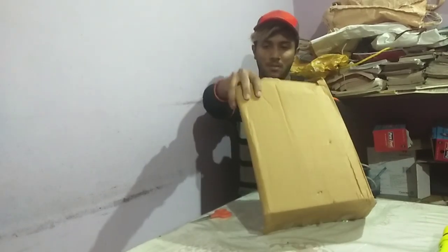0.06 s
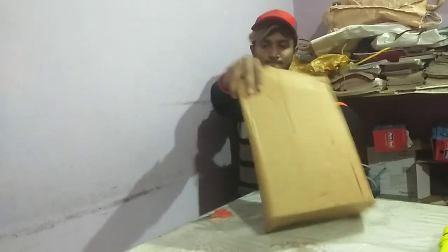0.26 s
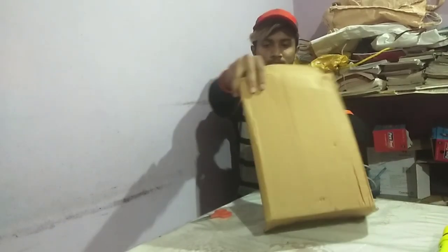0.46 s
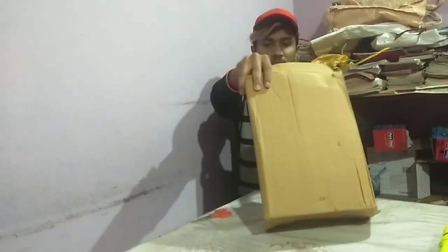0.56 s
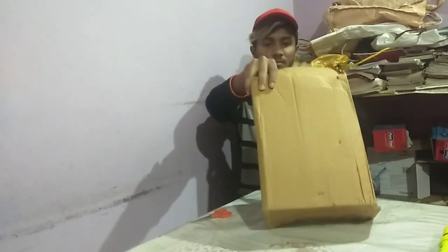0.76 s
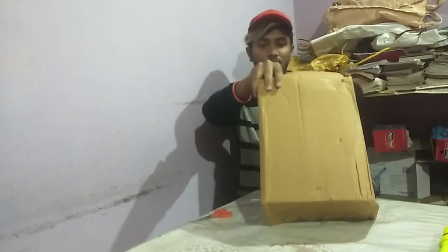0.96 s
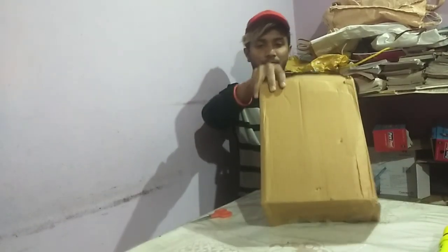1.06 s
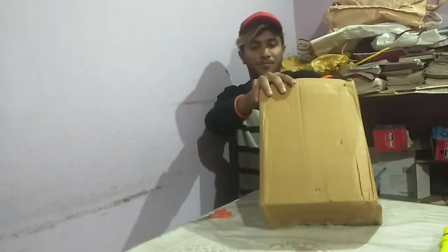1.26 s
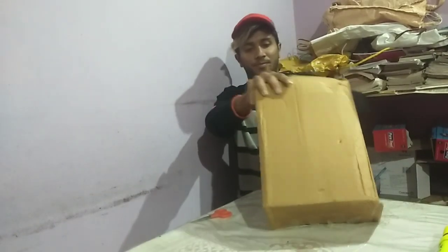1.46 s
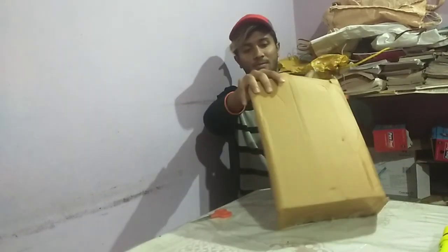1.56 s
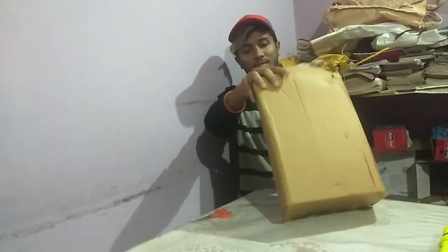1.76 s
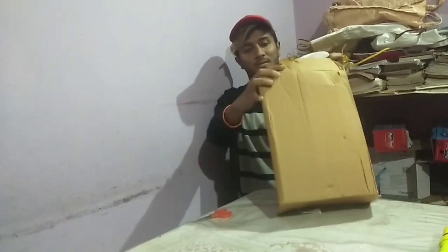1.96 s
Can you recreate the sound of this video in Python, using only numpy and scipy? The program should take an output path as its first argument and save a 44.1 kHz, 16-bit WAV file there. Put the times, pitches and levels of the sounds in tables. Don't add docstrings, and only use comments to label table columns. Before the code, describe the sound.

A large cardboard carton is handled on a plastic-covered table. Soft knocks and rustle at 0-0.15 s, then a loud, dense burst of hollow, papery thumps from 0.2 to 0.4 s, fading. Near quiet with tiny plastic ticks and a faint creak until 0.93 s. A shorter hollow thump peaks around 1.04 s, then uneven, crackling scraping runs 1.2-1.9 s, with a sharp snap near 1.7 s. Small room, faint low table rumble, mono.

```python
import sys
import numpy as np
from scipy import signal
from scipy.fft import rfft, irfft
from scipy.io import wavfile
from scipy.ndimage import uniform_filter1d

SR = 44100
rng = np.random.default_rng(int(sys.argv[2]) if len(sys.argv) > 2 else 0)


def invert_db(x):
    u = np.asarray(x, float) / 20
    return 10 ** u


def pcm_store(signal):
    levels = np.round(np.clip(np.atleast_2d(signal), -1, 1) * 32767)
    wavfile.write(sys.argv[1], SR, levels.astype(np.int16).T)


N = 88200
T = np.arange(N) / SR

# (time [s], peak level [dB], centre of the ring [Hz], crack level [dB])
WALL_KNOCKS = [(.016, -24, 1470, -14), (.026, -25, 770, -27), (.038, -27, 760, -16), (.054, -16, 1060, -21),
               (.074, -43, 810, -14), (.109, -36, 955, -14), (.209, -16.5, 636, -22), (.221, -17, 895, -5),
               (.236, -22, 800, -3), (.2435, -3.5, 1040, -6), (.2485, -4, 860, -8), (.259, 0.5, 850, -13),
               (.265, -4, 785, -6), (.271, -1.5, 1270, -4), (.275, -1.5, 1320, -8), (.282, -6.5, 1100, -8),
               (.289, -1, 930, -1), (.296, 2, 1560, -14), (.3075, -1.5, 1310, -5), (.312, -9.5, 1170, -7),
               (.324, -1.5, 1240, -5.5), (.344, -2.5, 1050, -5.5), (.350, -5.5, 900, -12),
               (.368, -12.5, 1320, -4), (.384, -13, 1440, -2.5), (.654, -33.5, 800, -9),
               (.934, -29, 330, -19), (.940, -28, 497, -26), (.946, -26, 746, -34), (.973, -26, 1170, -30),
               (.979, -21, 1140, -30), (1.035, -16.5, 455, -20), (1.038, -6, 520, -26),
               (1.044, -17, 900, -23), (1.053, -9, 546, -16), (1.064, -16.5, 1120, -20),
               (1.081, -21, 590, -28), (1.093, -26.5, 574, -29), (1.111, -20, 1580, -17),
               (1.154, -18, 2150, -19), (1.708, -27, 2120, 8), (1.977, -26.5, 1510, -9)]
# (frequency [Hz], level [dB], free ring time T60 [s])
WALL_MODES = [(234.6, 13, 0.17), (422.5, 6, 0.07), (542, 4, 0.095), (590, -2.5, 0.076), (667, -12, 0.033),
              (759, 3.5, 0.12), (886, -1.5, 0.082), (1003, 0, 0.077), (1200, 1, 0.073), (1240, -8, 0.02),
              (1449, 6, 0.039), (1635, -3, 0.09), (2150, 12.5, 0.023), (2670, -50, 0.09)]
# (frequency [Hz], density [dB per Hz])
CRACK_COLOUR = [(500, 0.5), (1500, 2.5), (3500, -3.5), (6500, -9.5), (15000, -15)]
# (time [s], level [dB], sheen level [dB])
TUMBLE_BOUTS = [
    [(0, -27, -35), (.016, -26.5, -22), (.048, -25, -17), (.068, -27, -20), (.138, -40.5, -4),
     (.185, -30, -19), (.2, -50, -5)],
    [(.19, -42, -7), (.206, -28, 0), (.211, -17, -2), (.232, -17, -1), (.246, -17, -3), (.35, -18, -4),
     (.39, -25, -5), (.53, -45, 1), (.72, -58, 0)],
    [(.93, -66, -15), (.936, -42, -14), (.965, -33.5, -11), (.984, -28.5, -24), (.995, -34.5, -11),
     (1.033, -39.5, -7), (1.038, -14.5, -20), (1.076, -25.5, -24), (1.2, -42.5, -7)],
]
# (frequency [Hz], density [dB per Hz])
CARD_COLOUR = [(150, -19.5), (330, -7.5), (520, 14.5), (800, 8.5), (1300, 11.5), (3000, -5), (9000, -45),
               (16000, -52)]
# (frequency [Hz], density [dB per Hz])
SHEEN_COLOUR = [(500, -3), (1500, 1.5), (3500, 1.5), (6500, -5.5), (9000, -3), (12500, -2), (15000, -13)]
# (time [s], level [dB], tilt [dB per octave])
DRAG_PRESSURE = [(1.08, -43.5, -3), (1.18, -39.5, -2.5), (1.225, -29.5, 1), (1.246, -20.5, 1),
                 (1.28, -32, -0.5), (1.33, -25, 0), (1.385, -28, -.5), (1.42, -24.5, -0.5),
                 (1.5, -22.5, 0.5), (1.58, -25.5, -1), (1.665, -24, 1), (1.68, -29.5, 0.5), (1.72, -27, 1),
                 (1.79, -26.5, -0.5), (1.85, -26.5, 1), (1.95, -38.5, 0), (1.985, -37, 3.5), (2, -34.5, -2)]
# (frequency [Hz], density [dB per Hz])
COVER_COLOUR = [(60, 9.5), (250, -13.5), (600, 0.5), (1200, 1.5), (2300, -1), (5000, -5.5), (10000, -7),
                (15000, -13.5)]
# (time [s], frequency [Hz])
CREASE_PITCH = [(1.1, 2180), (1.24, 5700), (1.33, 2190), (1.43, 4130), (1.56, 2440), (1.8, 2990),
                (1.9, 1374), (2, 2530)]
# (time [s], peak level [dB], centre [Hz], length [s])
PLASTIC_TICKS = [(.011, -33, 3300, .004), (.0165, -23, 3400, .0015), (.073, -33, 4200, .002),
                 (.054, -27, 4500, .003), (.056, -33, 13000, .003), (.193, -35, 13000, .006),
                 (.194, -30, 1200, .004), (.289, -12, 5000, .003), (.548, -35, 10500, .013),
                 (.599, -39, 2400, .003), (.599, -41, 4500, .003), (.600, -40, 7500, .003),
                 (.61, -46, 12500, .015), (.728, -40, 13500, .0015), (.729, -43, 4000, .002),
                 (.755, -50, 11000, .012), (.779, -46, 6000, .002), (.779, -46, 13000, .002),
                 (.858, -39, 12500, .0012), (.859, -41, 5000, .0015), (.944, -42, 12000, .002),
                 (.944, -40, 5000, .002), (.974, -32, 3200, .005), (1.048, -31, 12500, .009),
                 (1.152, -27, 2150, .003), (1.10, -36, 12500, .02), (1.233, -27, 12800, .004),
                 (1.246, -25, 12800, .003), (1.186, -34, 13500, .003), (1.186, -29, 5500, .004),
                 (1.11, -26, 4500, .005), (1.236, -23, 7000, .012), (1.40, -25, 4300, .03),
                 (1.44, -26, 4800, .03), (1.462, -19, 2200, .005), (1.983, -22, 3500, .003),
                 (1.982, -30, 12000, .003), (1.981, -21, 1450, .003)]
# (time [s], level [dB])
TABLE_THUDS = [(0, -63), (0.068, -54), (.21, -47), (0.26, -42), (0.332, -35), (0.399, -50), (.46, -50.5),
               (.53, -61.5), (.64, -61), (.07, -58.5), (0.934, -56), (.985, -53), (1.042, -46.5),
               (1.257, -56), (1.601, -47), (1.722, -50), (1.901, -54.5)]
# (frequency [Hz], density [dB per Hz])
ROOM_TONE_COLOUR = [(40, -4), (80, 8.5), (150, -3), (280, -13.5), (800, -7.5), (2500, -12.5), (8500, -22.5),
                    (14000, -29.5)]
# (frequency [Hz], gain [dB])
MIC_RESPONSE = [(60, -33), (200, -13), (330, -7.5), (520, -0.5), (7000, 0.5), (9000, -3), (11500, -1),
                (15000, 1.5)]

RING_OCT, SCATTER_DB = 0.9, 1
CONTACT_S, CRACK_S = 0.0012, 0.0061
DAMPED = 0.3
FLECKS_PER_S, FLECK_OCT, FLECK_CYCLES, FLECK_DB = 900, 0.5, 7, -4.5
CREAK_S, CREAK_LEN_S, CREAK_HZ, CREAK_DB = 0.8, 0.065, 810, -54.5
THUD_HZ, THUD_DB, THUD_T60_S = 70.4, 26.5, 0.5
ROOM_T60_S, ROOM_DB, ROOM_DAMP_HZ, TONE_DB = 0.5, -12, 6000, -45
CEILING, TOP_HZ = 0.8, 15330


def unit(x):
    return x / np.sqrt(np.mean(x ** 2))


def colour(x, points):
    hz, db = np.array(points, float).T
    f = np.fft.rfftfreq(4096, 1 / SR)
    gain_db = np.interp(np.log(f + 1), np.log(hz), np.maximum(db, -70))
    cepstrum = irfft(gain_db * np.log(10) / 20)
    cepstrum[1:2048] *= 2
    cepstrum[2049:] = 0
    impulse = irfft(np.exp(rfft(cepstrum)))
    return signal.fftconvolve(x, impulse)[:len(x)]


def band(x, hz, width):
    return signal.lfilter(*signal.iirpeak(min(hz, 0.45 * SR), hz / width, fs=SR), x)


def walk(rate):
    k = int(SR / rate)
    steps = np.repeat(rng.standard_normal(N // k + 1), k)
    return 0.64 * uniform_filter1d(uniform_filter1d(steps, k), k)[:N]


def slips(rate, spread_db):
    chance, size, sign = rng.random(N), rng.exponential(size=N), rng.standard_normal(N)
    return unit((chance < rate / SR) * sign * invert_db(spread_db * size))


def curve(rows, column=1):
    r = np.array(rows, float)
    return np.interp(T, r[:, 0], r[:, column])


def add(out, s, x):
    i = int(s * SR)
    out[i:i + len(x)] += x[:N - i]


def knocks():
    out, t = np.zeros(N), T[:8192]
    hz, db, t60 = np.array(WALL_MODES).T[:, :, None]
    for s, peak_db, centre, crack_db in WALL_KNOCKS:
        level_z, pitch_z, phase_z = rng.standard_normal((3, len(WALL_MODES), 1))
        crack = rng.standard_normal(8192)
        octaves_off = np.log2(hz / centre)
        gain = invert_db(db + SCATTER_DB * level_z - 10 * (octaves_off / RING_OCT) ** 2)
        phase = 2 * np.pi * hz * (1 + 0.012 * pitch_z) * t + 1.17 * phase_z
        ring = (gain * np.sin(phase) * 1000. ** (-t / (DAMPED * t60))).sum(0)
        rise = 1 - np.exp(-t / CONTACT_S)
        snap = unit(colour(crack, CRACK_COLOUR)) * np.exp(-t / CRACK_S) * invert_db(crack_db)
        add(out, s, invert_db(peak_db) * rise * (ring / np.abs(ring * rise).max() + snap))
    return out


def tumble():
    force = slips(6000, 1.2) * invert_db(2.3 * walk(120))
    walls = sum(invert_db(db) * band(force, hz, 14 / t60) for hz, db, t60 in WALL_MODES)
    body = unit(unit(walls) + 1.44 * unit(colour(force, CARD_COLOUR)))
    sheen = unit(colour(slips(9000, 1.5), SHEEN_COLOUR)) * invert_db(3 * walk(40))
    out = 0
    for rows in TUMBLE_BOUTS:
        on = (T >= rows[0][0]) & (T <= rows[-1][0])
        sheen_gain = invert_db(curve(rows, column=2))
        out = out + on * invert_db(curve(rows) - 5) * (body + sheen_gain * sheen)
    return out


def drag():
    force = unit(colour(slips(14000, 0.82), COVER_COLOUR))
    hiss, shared = 0, walk(15.47)
    tilt = curve(DRAG_PRESSURE, column=2)
    for hz in 60 * 2. ** np.arange(0, 8.6, 0.5):
        flicker = shared + 3 * min(hz / 600, 1) * walk(40)
        db = tilt * np.log2(hz / 3000) + flicker
        hiss = hiss + invert_db(db) * band(force, hz, 0.5 * hz)
    on = T > DRAG_PRESSURE[0][0]
    return on * invert_db(curve(DRAG_PRESSURE) - 3) * (hiss / 1.423 + flecks())


def flecks():
    out, t, n = np.zeros(N), T[:1024], FLECKS_PER_S * N // SR
    path_s, path_hz = np.array(CREASE_PITCH).T
    times = rng.random(n) * N / SR
    for s, pitch_z, size in zip(times, rng.standard_normal(n), rng.exponential(size=n)):
        hz = np.clip(np.interp(s, path_s, path_hz) * 2 ** (FLECK_OCT * pitch_z), 500, 9000)
        swell = (t * hz) * np.exp(-t * hz * 3 / FLECK_CYCLES)
        add(out, s, invert_db(1.8 * size) * np.sin(2 * np.pi * hz * t) * swell)
    return unit(out) * invert_db(FLECK_DB)


def ticks():
    out, t = np.zeros(N), T[:4096]
    for s, db, hz, length in PLASTIC_TICKS:
        puff = unit(band(rng.standard_normal(4096), hz, 0.24 * hz))
        add(out, s, invert_db(db - 3) * puff * (t / length) * np.exp(1 - t / length * 1.52))
    return out


def creak():
    phase = 2 * np.pi * np.cumsum(CREAK_HZ * (1 + 0.011 * walk(26.0))) / SR
    swell = np.exp(-((T - CREAK_S) / CREAK_LEN_S) ** 2)
    return invert_db(CREAK_DB + 3 * walk(37)) * swell * np.sin(phase)


def thuds():
    out, t = np.zeros(N), T[:SR // 2]
    for s, db in TABLE_THUDS:
        push = rng.standard_normal(len(t))
        boom = unit(band(band(push, THUD_HZ, 30), THUD_HZ, 50))
        overtone = unit(band(push, 3.3 * THUD_HZ, 60)) * np.exp(-t / 0.06)
        envelope = 1000. ** (-t / THUD_T60_S) * (1 - np.exp(-t / 0.0017))
        add(out, s, invert_db(db + THUD_DB) * (boom + 0.3 * overtone) * envelope)
    return out


def room(x):
    t = T[:SR // 2]
    noise = rng.standard_normal(len(t)) * np.minimum(t / 0.026, 1)
    low = signal.lfilter(*signal.butter(1, ROOM_DAMP_HZ, fs=SR), noise)
    low_tail = low * 1000. ** (-t / ROOM_T60_S)
    high_tail = 1.48 * (noise - low) * 1000. ** (-t / (0.79 * ROOM_T60_S))
    tail = low_tail + high_tail
    return x + invert_db(ROOM_DB) * signal.fftconvolve(x, tail / np.sqrt(np.sum(tail ** 2)))[:N]


def room_tone():
    air = unit(colour(rng.standard_normal(N), ROOM_TONE_COLOUR))
    return air * invert_db(TONE_DB - 2.5 + 0.5 * walk(8.7))


def scene():
    tone = room_tone()
    carton = knocks() + ticks() + tumble() + drag() + creak()
    mono = room(carton) + tone + thuds()
    return np.array([mono, mono])


def band_limit(x):
    return signal.sosfilt(signal.butter(12, 15830, fs=SR, output="sos"), x)


def record(dry):
    heard = np.array([colour(x, MIC_RESPONSE) for x in dry])
    limited = CEILING * np.tanh(heard / CEILING)
    thin = signal.sosfilt(signal.butter(2, 50, "high", fs=SR, output="sos"), limited)
    mix = signal.sosfilt(signal.ellip(10, 0.2, 80, TOP_HZ, fs=SR, output="sos"), thin)
    return band_limit(mix)


dry = scene()
out = record(dry)
pcm_store(out)
```